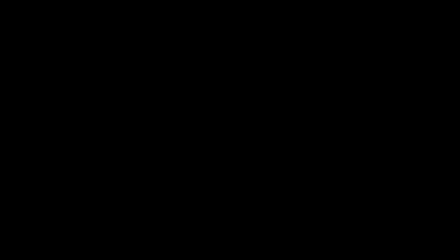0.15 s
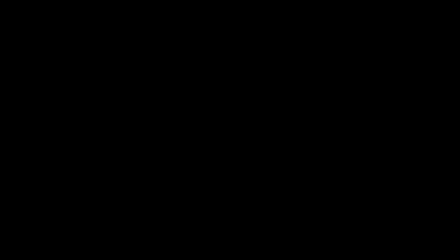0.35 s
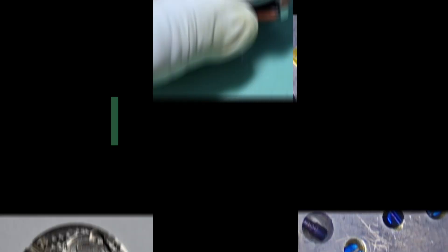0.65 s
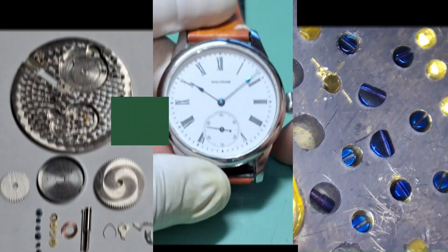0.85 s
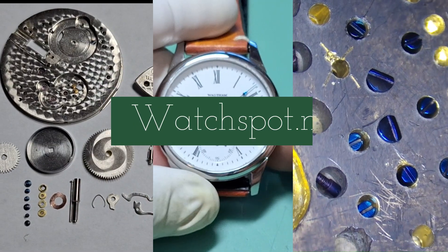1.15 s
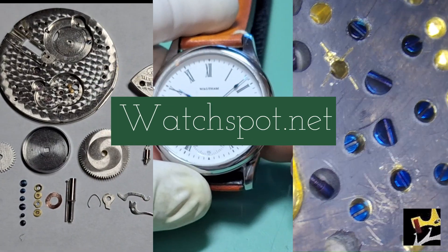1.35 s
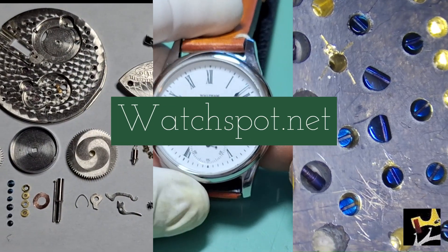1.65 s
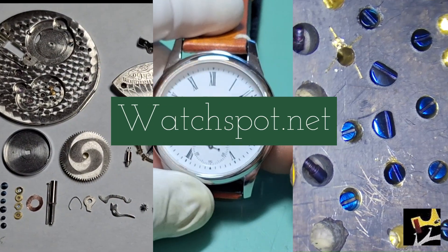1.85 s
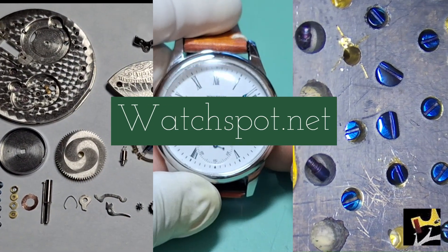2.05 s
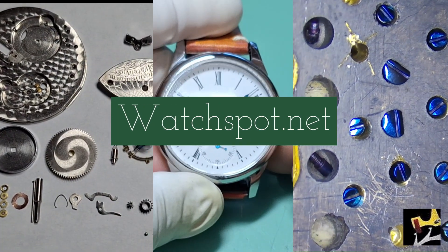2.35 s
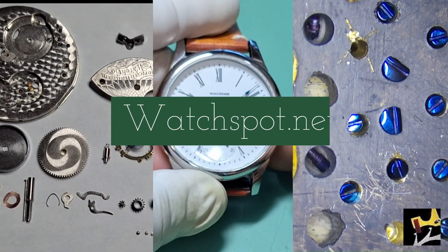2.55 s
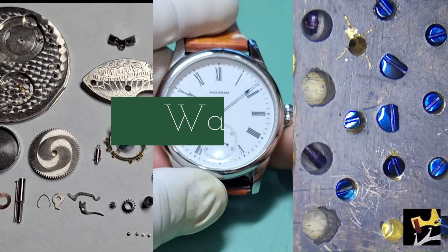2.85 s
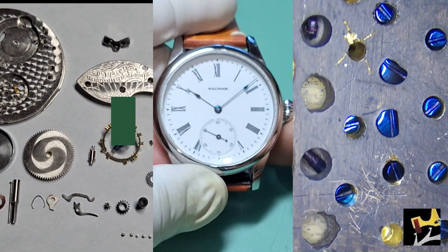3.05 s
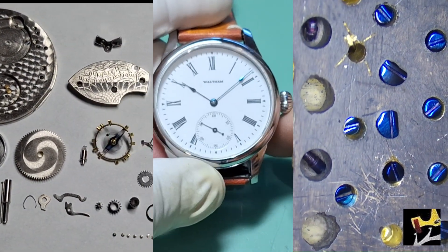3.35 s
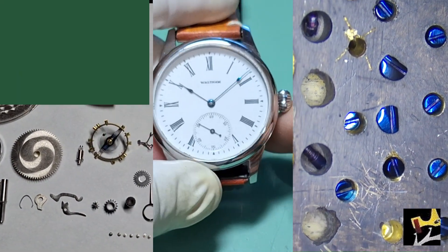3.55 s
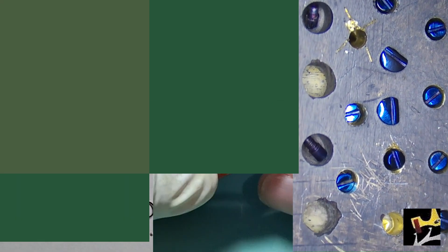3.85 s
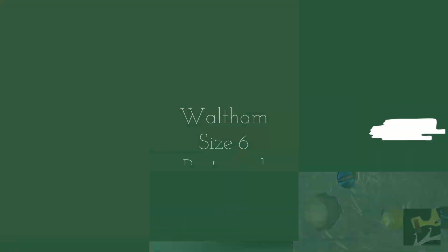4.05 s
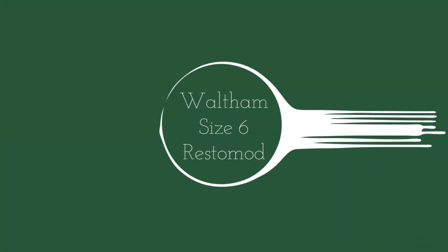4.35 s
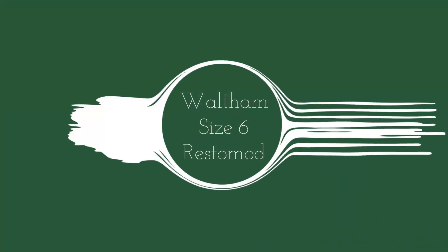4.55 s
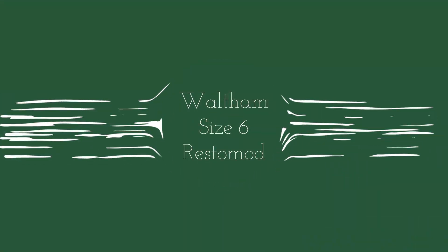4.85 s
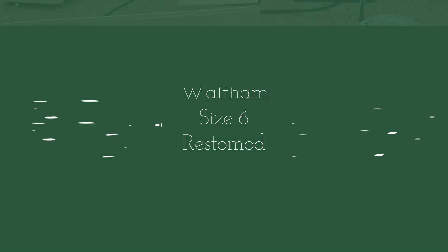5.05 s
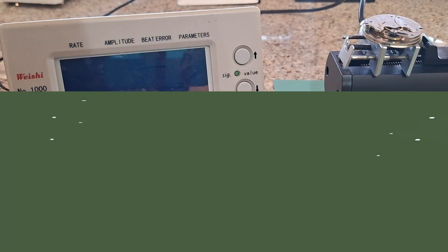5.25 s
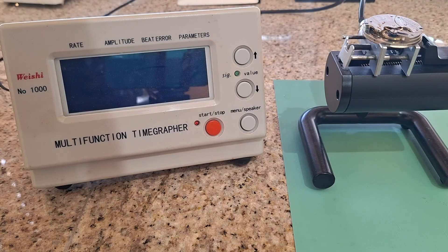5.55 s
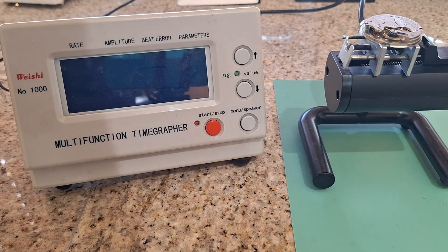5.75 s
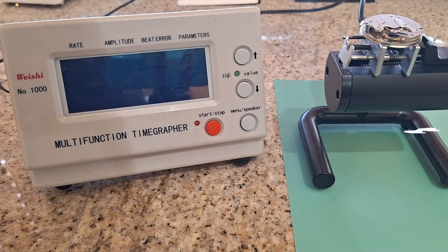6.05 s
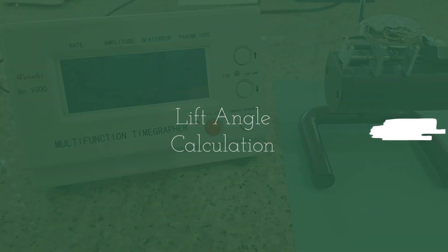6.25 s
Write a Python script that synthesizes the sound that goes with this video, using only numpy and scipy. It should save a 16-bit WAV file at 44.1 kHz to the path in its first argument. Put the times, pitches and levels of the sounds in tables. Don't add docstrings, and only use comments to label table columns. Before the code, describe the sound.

A mechanical watch ticks very close to a contact pick-up, between four and five dry metallic beats a second, each a tiny cluster of clicks. Faint quiet-room air and mains hum fade in after half a second and cut off past four. Near five seconds a soft low thump opens a louder, bassier microphone with pulsing hum, rumble and hiss, then small knocks and a sleeve rustle.

```python
import sys
import numpy as np
from scipy import signal
from scipy.fft import rfft, irfft
from scipy.io import wavfile
from scipy.ndimage import uniform_filter1d

SR = 44100
rng = np.random.default_rng(int(sys.argv[2]) if len(sys.argv) > 2 else 0)


def boost_factor(decibels):
    exponent = np.asarray(decibels, float) / 20
    return 10 ** exponent


def unload_audio(sound):
    columns = np.transpose(np.atleast_2d(sound))
    steps = np.round(np.clip(columns, -1, 1) * 32767)
    wavfile.write(sys.argv[1], SR, steps.astype(np.int16))


N = 282444


def level(x, db):
    return x * boost_factor(db) / np.sqrt(np.mean(x ** 2))


def resonance(x, hz, width):
    return signal.lfilter(*signal.iirpeak(hz, hz / width, fs=SR), x)


def spread(x, pan_db):
    return x * boost_factor(np.array([[pan_db], [-pan_db]]) / 2)


# (frequency [Hz], left minus right [dB], likeness [0-1])
PORTS = [(25.7, -9, 1), (70, 12, 1), (296, 3, 0.88), (672, 6, 0.18), (1500, 2, 0.25), (5000, 1.5, 0.08),
         (15100, -2, 0)]


def air(colour, db):
    logf = np.log(np.maximum(np.fft.rfftfreq(N, 1 / SR), 1))

    def curve(table, column):
        points = np.array(table)
        return np.interp(logf, np.log(points[:, 0]), points[:, column])

    pan_db = curve(PORTS, 1)
    alike = np.clip(curve(PORTS, 2), 0, 1)
    mid, side = rfft(rng.standard_normal((2, N))) * boost_factor(curve(colour, 1))
    mid = mid * np.sqrt(1 + alike)
    side = side * np.sqrt(1 - alike)
    left, right = (mid + side) * boost_factor(pan_db / 2), (mid - side) * boost_factor(-pan_db / 2)
    pair = irfft([left, right], N)
    return pair * boost_factor(db) / np.sqrt(np.mean(pair.mean(axis=0) ** 2))


def hum(lines, unsteady=0.35, pan_db=4.5):
    out = np.zeros(N)
    for hz, width, db in lines:
        tone = np.sqrt(2) * np.sin(2 * np.pi * hz * np.arange(N) / SR)
        skirt = level(resonance(rng.standard_normal(N), hz, width), 0)
        out += level(tone + unsteady * skirt, db)
    return spread(out, pan_db)


# (time [s], level [dB])
ROOM_FADE = [
    (.43, -58),
    (.45, -21),
    (.6, -10),
    (.8, -4),
    (1.0, 0.5),
    (1.3, 2),
    (4.317, 2),
    (4.326, -35),
]
# (frequency [Hz], level per Hz [dB])
ROOM_COLOUR = [(20, -27.5), (60, -4.5), (170, -14.5), (241, -6.5), (300, -16.5), (800, -25.5), (1030, -30),
               (1860, -30.5), (3070, -38.5), (7300, -41), (14300, -41.5), (15000, -32), (15300, -21.5),
               (15750, -33), (16000, -78)]
# (frequency [Hz], width [Hz], level [dB])
ROOM_HUM = [(62, 10, -77), (120.3, 9.7, -77), (239.9, 1.2, -65.5), (358, 3.9, -80.5), (811, 15, -90.5)]
ROOM_DB = -67.5


def room():
    s, db = np.transpose(ROOM_FADE)
    gain = boost_factor(np.interp(np.arange(N) / SR, s, db, left=-200, right=-200))
    return gain * (air(ROOM_COLOUR, ROOM_DB) + hum(ROOM_HUM))


# (time [s], frequency [Hz], width [Hz], level [dB], decay [ms])
KNOCKS = [
    (5.599, 4320, 5960, -47.5, 13),
    (5.614, 7800, 2970, -45, 2.1),
    (5.655, 3000, 5000, -49.5, 34),
    (5.695, 9000, 9000, -44, 1.4),
    (5.702, 547, 60, -39, 2.8),
    (5.713, 462, 80, -47, 4.68),
    (5.701, 900, 200, -51, 8),
    (5.731, 537, 440, -50, 41),
    (5.745, 517, 120, -47, 14),
]


def handling(pan_db=5.0):
    out = np.zeros(N)
    span = np.arange(3000)
    for s, hz, width, db, ms in KNOCKS:
        burst = rng.standard_normal(len(span)) * np.exp(-span / (ms * SR / 1000))
        ring = resonance(burst, hz, width)
        out[int(s * SR):][:len(span)] += boost_factor(db) * ring / np.abs(ring).max()
    return spread(out, pan_db)


RUSTLE_S, RUSTLE_WIDTH_S, RUSTLE_DB = 5.68, 0.075, -63


def rustle(rough_db=0.5):
    swell = np.exp(-((np.arange(N) / SR - RUSTLE_S) / RUSTLE_WIDTH_S) ** 2)
    grains = rng.standard_normal((2, N)) * boost_factor(rough_db * rng.exponential(size=N))
    brushing = resonance(resonance(grains, 6000, 9000), 7000, 12000)
    return swell * level(brushing, RUSTLE_DB)


# (frequency [Hz], level per Hz [dB])
BENCH_COLOUR = [(7, -38), (12, 6.5), (35, -3), (80, -15.5), (165, -20.5), (251, -19), (394, -27.5),
                (1000, -31.5), (1440, -33), (5250, -44.5), (13800, -44.5), (15700, -44), (16000, -78)]
# (frequency [Hz], width [Hz], level [dB])
BENCH_HUM = [(238.8, 18, -60.5), (728, 9.8, -74.5)]
BENCH_DB, ON_S = -45, 4.9213
SETTLE_PER_S, STEP_DB = 4.83, (-18.5, -28.5)
BEAT_HZ, BEATS_PER_S, CANCEL_S = 117.9, 2.13, 5.465
BEAT_DB, UPPER_SHARE = -53, 0.73


def bench(pan_db=4.0):
    t = np.arange(N) / SR
    since = SETTLE_PER_S * np.maximum(t - ON_S, 0)
    thump = boost_factor(np.array(STEP_DB))[:, None] * (1 - since) * np.exp(-since)
    thump *= 1 - .3 * np.exp(-((t - ON_S - .004) / 4e-5) ** 2)
    turn = 2 * np.pi * (t - CANCEL_S)
    beat = np.sin(BEAT_HZ * turn) - UPPER_SHARE * np.sin((BEAT_HZ + BEATS_PER_S) * turn)
    beat = spread(np.sqrt(2) * boost_factor(BEAT_DB) * beat, pan_db)
    hiss = air(BENCH_COLOUR, BENCH_DB)
    return (t >= ON_S) * (thump + beat + hum(BENCH_HUM) + hiss + handling() + rustle())


# (drop time [s], drop level [dB], catch level [dB], impulse level [dB], unlock lead [ms])
TICKS = [(0.0161, -29, -42, -38.5, 24.3), (0.457, -29.5, -56, -41.5, 23.4),
         (0.8961, -28.5, -36.5, -43, 21.6), (1.3357, -29, -35, -40, 23.2),
         (1.7753, -33, -32.5, -39.5, 23.8), (2.2118, -31.5, -44, -40, 22.6), (2.6495, -32, -32.5, -45, 25),
         (3.0873, -27.5, -41, -48.5, 22.2), (3.5269, -35, -38, -50, 23.8), (3.965, -30.5, -60, -48.5, 22.4),
         (4.4037, -33, -50, -43.5, 24.2), (4.8431, -31, -42, -47, 23), (5.2814, -33, -58, -41, 23.3)]
# (drop time [s], drop level [dB], catch level [dB], impulse level [dB], unlock lead [ms])
TOCKS = [(0.2394, -30.5, -33, -56, 28.4), (0.676, -29, -48, -47, 24.5), (1.1155, -31, -41, -45.5, 24.1),
         (1.558, -33, -35.5, -43.5, 30), (1.9947, -31.5, -54.5, -43.5, 25),
         (2.435, -36, -32.5, -47.5, 31.3), (2.8709, -33.5, -38, -41, 27.8), (3.3095, -33.5, -36, -48, 27.4),
         (3.7463, -35, -56, -47, 30), (4.186, -36.5, -41.5, -45, 29), (4.6244, -33, -58, -51.5, 27.4),
         (5.0634, -33, -46, -48, 33), (5.5053, -38, -34.5, -46.5, 33.7)]
# (time [s], level [dB], second bounce later by [ms], its level [dB])
REBOUNDS = [(0.0845, -45.5, 18, -55), (0.5237, -51, 14.3, -53), (0.961, -44.5, 23, -52),
            (1.3995, -47, 24, -57), (1.8384, -44.5, 19.2, -51.5), (2.2743, -47.5, 17.6, -49.5),
            (2.7133, -44.5, 14.3, -49), (3.1509, -43, 12.2, -48.5), (3.5921, -44, 12.3, -59),
            (4.033, -51, 12, -74), (4.4717, -46, 11, -48.5), (4.9111, -47, 18.2, -49),
            (5.3542, -46.5, 14.7, -55)]
# (time [s], level [dB])
SETTLES = [(0.035, -52), (0.474, -70), (0.9117, -54.5), (1.349, -47.5), (1.7895, -47), (2.2278, -48),
           (2.6686, -53.5), (3.1027, -53), (3.982, -58.5), (4.8669, -53), (5.079, -54)]
# (time [s], level [dB])
CHATTER = [(0.2174, -47), (0.2254, -53), (0.2297, -43.5), (0.667, -43.5), (1.0992, -46.5), (1.1075, -53),
           (1.5453, -48), (1.7806, -36), (1.9867, -46.5), (2.4203, -42), (3.0754, -48), (3.3184, -40.5),
           (3.5328, -46), (3.5393, -45), (3.9703, -33.5), (4.163, -51.5), (4.4101, -58), (4.4763, -58),
           (4.6047, -62), (4.8522, -42), (5.0558, -37), (5.4934, -42)]
# (time [s], plates level [dB], case minus plates [dB])
STRAYS = [(0.024, -48.5, 3), (0.325, -71.5, 1), (0.5049, -72, -4), (0.71, -57.5, -0.5), (1.3694, -58, -4),
          (1.5031, -46, -12), (1.807, -56, -5), (1.9453, -46, -9.5), (2.2997, -69, 8), (2.3598, -53, -4.5),
          (2.45, -49.5, -1), (2.4677, -57, -7), (2.7368, -48, -5), (2.794, -50, -8.5), (3.0935, -66, 5),
          (3.1724, -51, -1), (3.335, -57.5, -4), (3.3621, -53.5, 1), (3.3769, -50, -8.5),
          (3.3866, -61, 2.5), (3.5538, -67, 10.5), (3.576, -55.5, -2.5), (4.212, -52.5, 0),
          (4.2286, -53.5, -2.5), (4.251, -60, 1), (4.5787, -61, -2), (4.6429, -49.5, 2.5),
          (4.6765, -67, -2.5), (4.6936, -74, -6), (4.884, -55, -0.5)]
UNLOCK_DB, SLIDE_DB = -58, -58.5
SLIDE_MS, IMPULSE_MS = 6.8, 11.7
CATCH_MS = 3.5
# (case minus plates [dB], small parts minus plates [dB], rattle [ms])
UNLOCK, SLIDE, IMPULSE = (-9, -8, 4.2), (-10, -12, 4.2), (-12, -11, 3.4)
CATCH, TICK_DROP, TOCK_DROP = (-11, -9.5, 2.13), (-12.5, -7.5, 2.53), (-13, -10.5, 2.84)
FIRST, SECOND, STRAY = (-11, -22, 1.95), (-3.5, -10, 1.9), (0.0, -10.5, 2.07)
SETTLE, CHATTERING = (0.3, -1, 2.16), (-12, -11, 2.6)


def escapement():
    rows = []
    for beats, drop in ((TICKS, TICK_DROP), (TOCKS, TOCK_DROP)):
        for s, drop_db, catch_db, impulse_db, lead_ms in beats:
            unlock = s - lead_ms / 1000
            rows.append((unlock, UNLOCK_DB, *UNLOCK))
            rows.append((unlock + SLIDE_MS / 1000, SLIDE_DB, *SLIDE))
            rows.append((unlock + IMPULSE_MS / 1000, impulse_db, *IMPULSE))
            rows.append((s - CATCH_MS / 1000, catch_db, *CATCH))
            rows.append((s, drop_db, *drop))
    for s, db, later_ms, second_db in REBOUNDS:
        rows.append((s, db, *FIRST))
        rows.append((s + later_ms / 1000, second_db, *SECOND))
    rows += [(s, db, *SETTLE) for s, db in SETTLES]
    rows += [(s, db, *CHATTERING) for s, db in CHATTER]
    rows += [(s, db, STRAY[0] + case_db, *STRAY[1:]) for s, db, case_db in STRAYS]
    return np.array([row for row in rows if row[0] * SR > 12])


# (frequency [Hz], width [Hz], level [dB])
HOLDER = [(120, 13, -47), (750, 30.6, -32), (2270, 14, -39), (3650, 10, -50), (6050, 9, -47),
          (6980, 30, -46)]


def holder(blows):
    out = np.zeros(N)
    for hz, width, db in HOLDER:
        ring = resonance(resonance(blows, hz, width), hz, 3 * width)
        speed = 20 + hz / 30
        wobble = resonance(resonance(rng.standard_normal(N), 30, speed), 30, speed)
        flutter = level(wobble, -5)
        out += boost_factor(db) * blows.max() * ring * (.7 + flutter) / np.abs(ring).max()
    return out


TAIL_T60_S, TAIL_DB = 0.068, -16.5


def bench_tail(x):
    t = np.arange(SR // 4) / SR
    tail = resonance(rng.standard_normal(len(t)), 6500, 6800) * 1000.0 ** (-t / TAIL_T60_S)
    tail *= boost_factor(TAIL_DB) / np.sqrt(np.sum(tail ** 2))
    return signal.fftconvolve(x, tail)[:N]


# (frequency [Hz], width [Hz], level [dB])
CASE = [(785, 70, -12), (1169, 69, -6), (1402, 93, 1.5), (1764, 73, -4.5), (2172, 188, -1.5),
        (2299, 124, -1), (3130, 330, -3), (3446, 163, -1)]
# (frequency [Hz], width [Hz], level [dB])
PLATES = [(4763, 800, -8.5), (5580, 147, -2), (6100, 290, 0), (6190, 73, -5), (6640, 640, 0.5),
          (7344, 400, -6.5)]
# (frequency [Hz], width [Hz], level [dB])
PARTS = [(8160, 700, -2.5), (9350, 110, -2.5), (9980, 540, -1), (10664, 100, -2.5), (11950, 890, -11),
         (13300, 1400, -16.5)]
# (frequency [Hz], level per Hz [dB])
PICKUP = [(18, -38.5), (30, -13), (277, -5.5), (467, -13.5), (6720, -12.5), (8280, -13.5), (15500, -11)]
PICKUP_DB = -85.5


def watch(rough_db=3.5, scatter_db=2.5, linger=1.55, rise=0.4, strike=1.03, strike_ms=0.34):
    s, plates_db, case_db, parts_db, ms = escapement().T
    span = np.arange(1300)
    where = np.minimum((s * SR).astype(int)[:, None] + span - 12, N - 1)
    shape = (len(s), len(span))
    contacts = boost_factor(rough_db * rng.exponential(size=shape))
    out, blows = np.zeros(N), np.zeros(N)
    blows[where[:, 0]] = boost_factor(plates_db)
    for modes, db, slow in ((CASE, case_db, linger), (PLATES, 0, 1), (PARTS, parts_db, .8)):
        age = span / (SR / 1000 * slow * np.clip(ms, .2, 12)[:, None])
        rattle = np.exp(-age) * (1 - np.exp(-age / rise))
        hard_contact = strike * np.exp(-((span / (SR / 1000) - strike_ms) / strike_ms) ** 2)
        force = (rattle + hard_contact) * contacts
        rings = 0
        for hz, width, mode_db in modes:
            stir = boost_factor(mode_db + scatter_db * rng.standard_normal((len(s), 1)))
            ring = resonance(force * rng.standard_normal(shape), hz, width)
            rings = rings + stir * resonance(ring, hz, 4 * width)
        loudest = np.sqrt(uniform_filter1d(2 * rings ** 2, size=90, axis=1).max(axis=1))
        np.add.at(out, where, rings * (boost_factor(plates_db + db) / loudest)[:, None])
    out += holder(blows)
    return out + bench_tail(out) + air(PICKUP, PICKUP_DB).mean(axis=0)


def scene():
    pickup = signal.cheby1(6, .5, 15900, fs=SR, output="sos")
    return room() + bench() + signal.sosfilt(pickup, watch())


def band_limit(x):
    return signal.sosfilt(signal.butter(12, 16500, fs=SR, output="sos"), x)


def record(dry):
    return band_limit(dry)


dry = scene()
out = record(dry)
unload_audio(out)
```